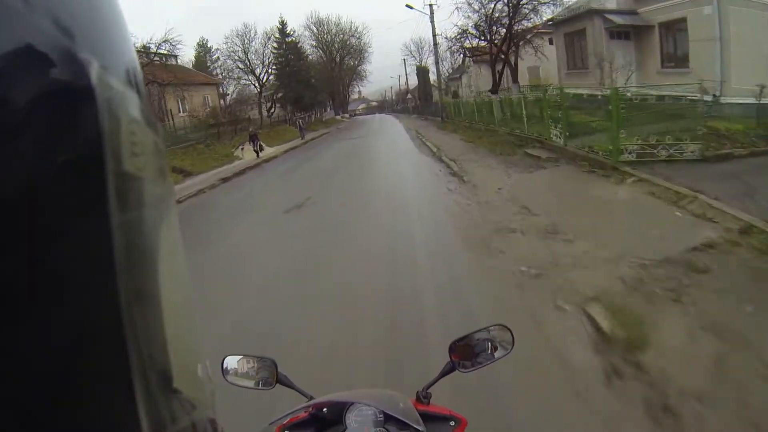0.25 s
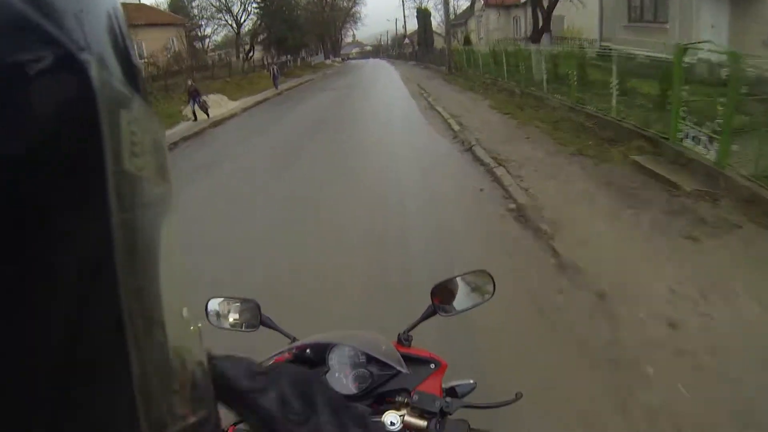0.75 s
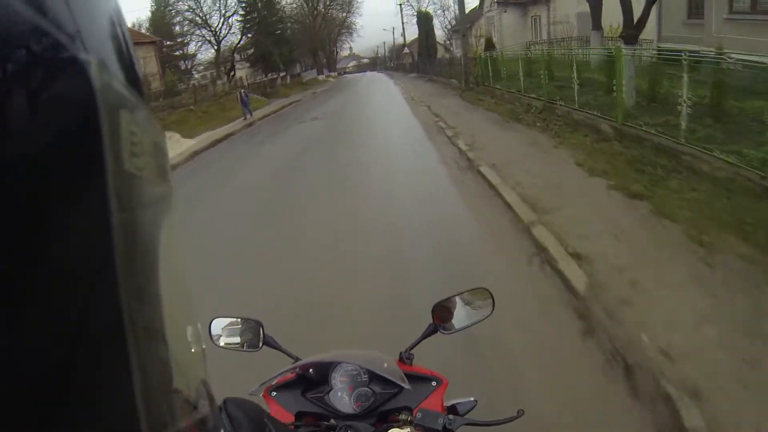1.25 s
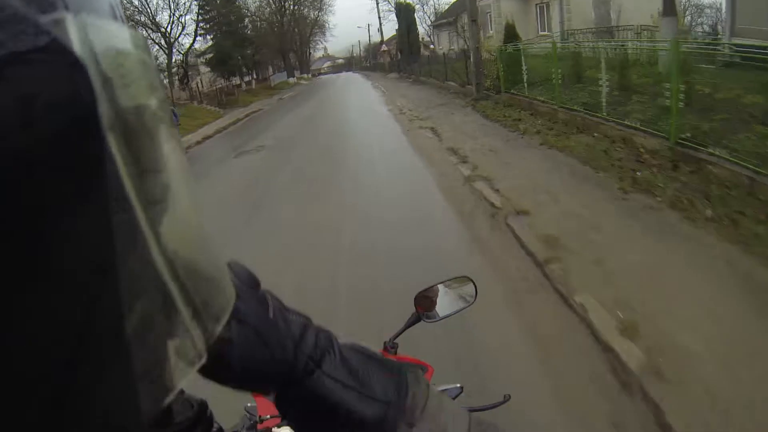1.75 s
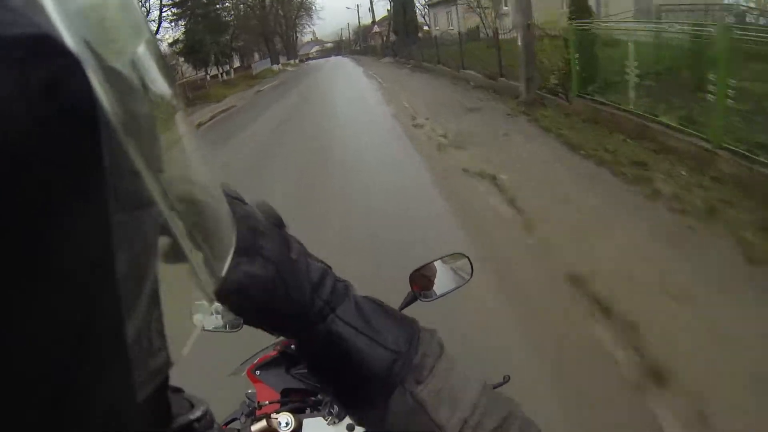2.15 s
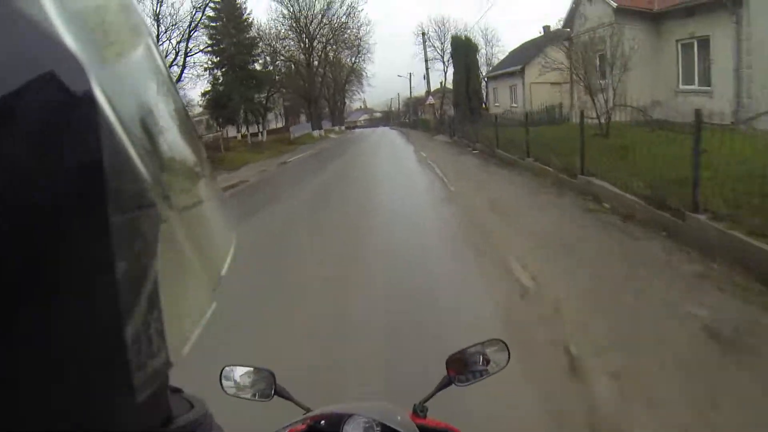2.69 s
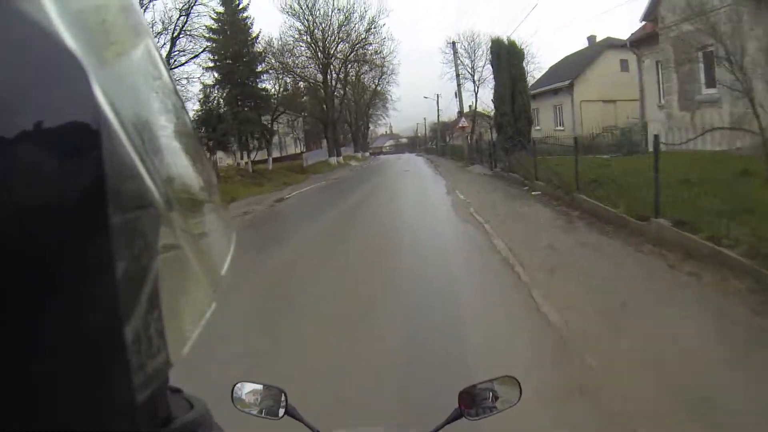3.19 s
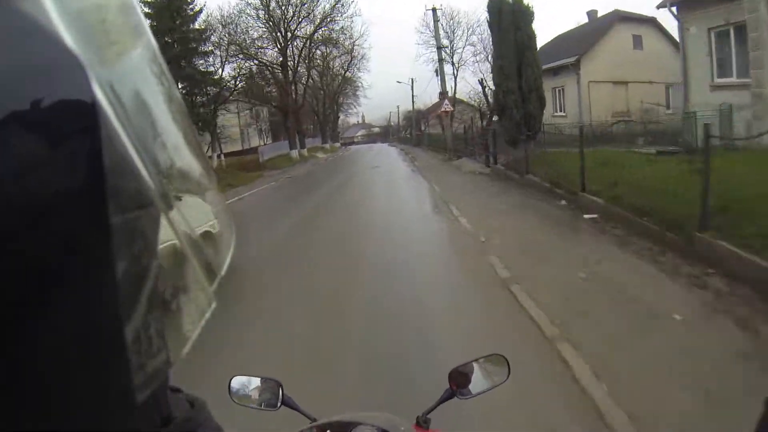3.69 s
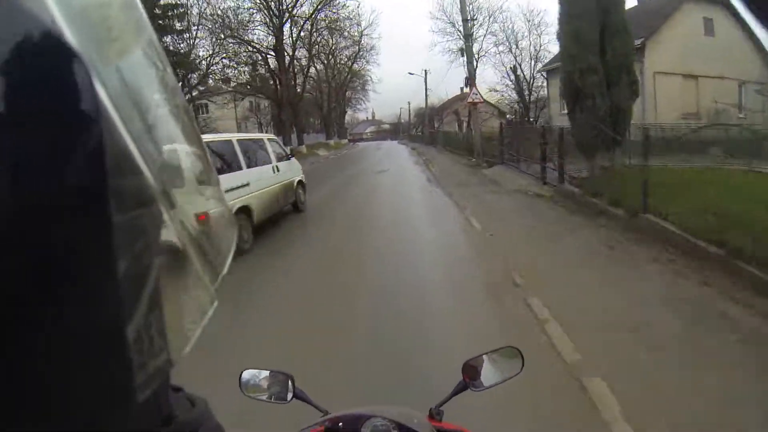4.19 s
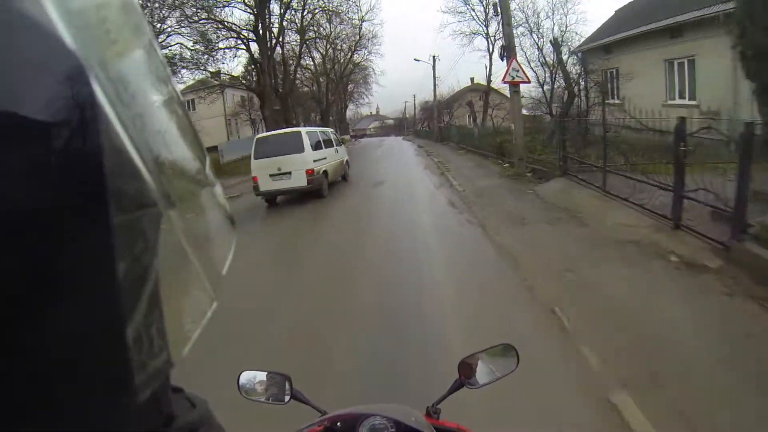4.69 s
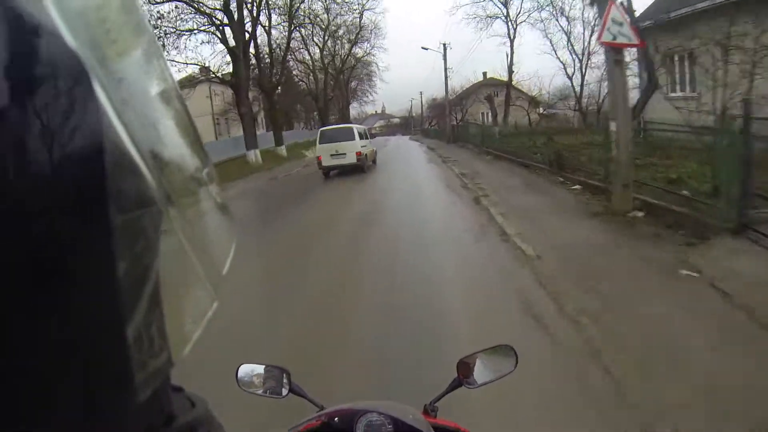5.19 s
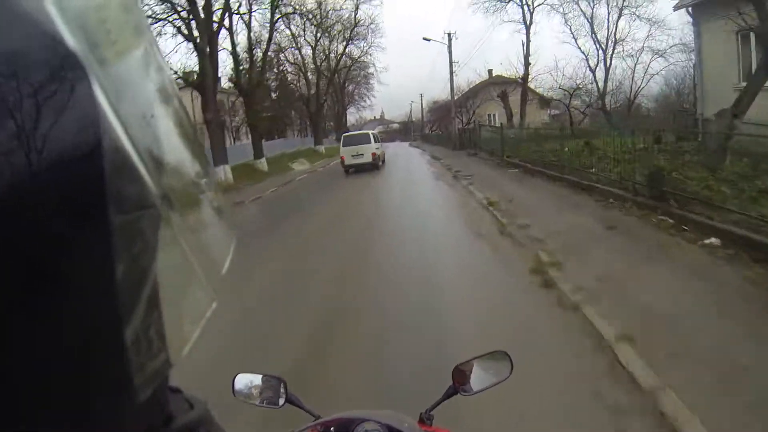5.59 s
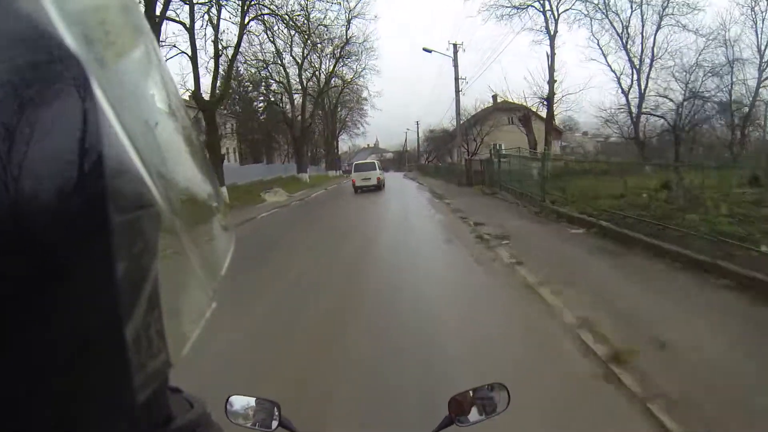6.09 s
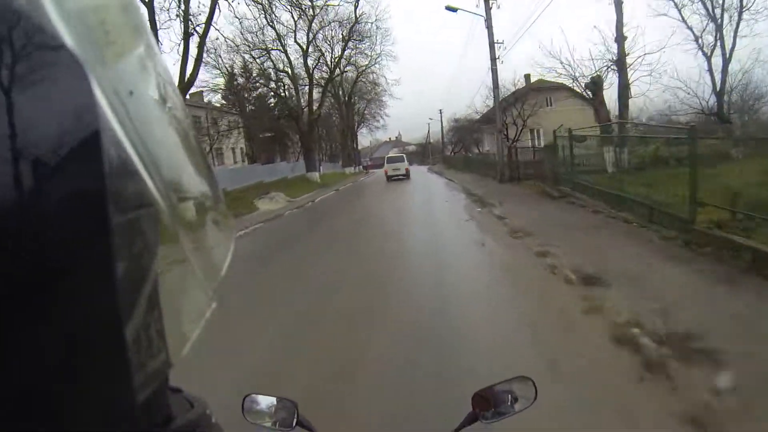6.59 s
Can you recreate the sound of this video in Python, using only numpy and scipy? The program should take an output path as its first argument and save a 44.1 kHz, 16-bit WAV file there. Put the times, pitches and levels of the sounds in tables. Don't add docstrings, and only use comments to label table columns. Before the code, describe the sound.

Boxy helmet-mic motorcycle ride on a wet street: muffled wind and low engine hum, heavy glove thumps, squeaky visor rubs, a passing van's hissing spray.

```python
import sys
import numpy as np
from scipy import signal
from scipy.io import wavfile
from scipy.ndimage import uniform_filter1d

SR = 44100
rng = np.random.default_rng(int(sys.argv[2]) if len(sys.argv) > 2 else 0)


def elevation(decibels):
    levels = np.asarray(decibels, float)
    return 10 ** (levels / 20)


def wav_record(signal):
    frames = np.transpose(np.atleast_2d(signal))
    bounded = np.clip(frames, -1, 1)
    quanta = np.round(bounded * 32767).astype(np.int16)
    wavfile.write(sys.argv[1], SR, quanta)


N = 302084

# start_s, wind_db, engine_db, visor_opening (0-1)
RIDE_COURSE = [(0.0, -38.5, -43.5, 0.3), (.5, -37.5, -41, 0.5), (.85, -37.5, -41, 0.33),
               (1.05, -36.5, -34.5, 0.78), (1.22, -34.5, -34, 0.72), (1.47, -36.5, -38.5, 0.83),
               (1.75, -33.5, -32.5, 0.93), (1.96, -39, -36, 0.94), (2.18, -35.5, -32.5, 1.01),
               (2.6, -34.5, -36.5, 1.01), (2.9, -35, -36.5, 0.76), (3.62, -34, -37, 0.65),
               (3.8, -34, -37.5, 0.64), (4.3, -35.5, -41.5, 0.52), (4.6, -35, -40, 0.46),
               (5.2, -35, -42, 0.53), (5.92, -38, -39, 0.37), (6.85, -39, -39.5, 0.28)]
CALM_DB = -36


def evened(x):
    return x / np.sqrt(np.mean(x ** 2) + 1e-20)


def add(mix, s, sound):
    part = mix[round(s * SR):][:len(sound)]
    part += sound[:len(part)]


def curve(rows, column):
    table = np.transpose(rows)
    return np.interp(np.arange(N) / SR, table[0], table[column])


def bumps_db(modes, hz):
    return sum(db / (1 + (2 * (hz - f0) / width) ** 2) for f0, width, db in modes)


def colour_db(points, hz, stretch=1):
    # pitch_hz, width_hz, lift_db
    case_modes = [(75, 10, 4), (110, 28, 2.5), (188.6, 9.5, 6), (399, 73, 19.5), (860, 180, 8),
                  (1400, 453, 15), (1950, 830, 0.5), (2457, 214, 8.5), (2967, 290, 7), (3420, 550, 5),
                  (4760, 950, 7), (6120, 490, 4.5), (7620, 1300, 6.5), (13600, 1000, 2)]
    f, db = np.transpose(points)
    source_db = np.interp(np.log(hz / stretch + 1), np.log(f + 1), db, left=-90, right=-90)
    return source_db + bumps_db(case_modes, hz)


def stream(points, level_db, size, patchy_db, flicker_db, stretch=1, damped=False):
    hop, hz = size // 4, np.fft.rfftfreq(size, 1 / SR)
    frames = N // hop + 5
    a, b, patches = rng.standard_normal((frames, len(hz), 3)).T
    patches = uniform_filter1d(patches, size=7, axis=0)
    patches = evened(uniform_filter1d(patches, size=9, axis=1))
    flicker = evened(uniform_filter1d(rng.standard_normal(frames), size=5))
    frame_starts = np.minimum(np.arange(frames) * hop, N - 1)
    stretch = (stretch * np.ones(N))[frame_starts]
    db = colour_db(points, hz[:, None], stretch) + patchy_db * patches + flicker_db * flicker
    noise = signal.istft((a + 1j * b) * elevation(db), nperseg=size, noverlap=size - hop)[1][:N]
    if damped:
        noise = noise / np.sqrt(uniform_filter1d(evened(noise) ** 2, size=size) + 0.05)
    return evened(noise) * elevation(level_db)


def wind():
    # pitch_hz, level_db
    rush_colour = [(300, -56), (500, -2), (900, -9.5), (1500, 2), (2300, -7), (4500, -51), (7000, -31.5),
                   (10000, -69), (16000, -52)]
    gap_colour = [(1500, -43), (2400, -11), (3100, 0), (3800, -11), (5200, -32), (6150, -16.5), (7200, -29),
                  (10600, -30), (16000, -56)]
    heave_colour = [(2, -20), (7, -3), (12, 0), (18, -5), (30, -30)]
    buffet_colour = [(10, -13.5), (20, -4), (29, -10), (45, -17.5), (80, -27.5), (200, -66)]
    drone_colour = [(110, -23), (145, -14.5), (170, 10), (200, -6), (260, -35)]
    # start_s, buffeting_db
    gusts = [(0.0, -50), (.6, -30), (.78, -34.5), (.9, -21), (1.24, -30), (1.47, -42), (1.62, -22.5),
             (2.3, -27), (2.61, -32), (2.85, -32.5), (3.3, -39), (3.45, -32.5), (4.06, -29), (4.5, -28.5),
             (5.15, -44), (5.5, -39), (5.93, -30), (6.85, -30.5)]
    opening = curve(RIDE_COURSE, column=3)
    rush = stream(rush_colour, curve(RIDE_COURSE, column=1), size=512, patchy_db=0.4, flicker_db=-0.1)
    gap_pitch = (2792 + 260 * opening ** 2) / 3100
    hiss = stream(gap_colour, -56 + 11.5 * opening, size=512, patchy_db=0.6, flicker_db=1.0, stretch=gap_pitch)
    heave_db = -32 + 7 * elevation(van_db(0, 0))
    heave = stream(heave_colour, heave_db, size=8192, patchy_db=1.1, flicker_db=0.6, damped=True)
    buffet_db = curve(gusts, column=1)
    buffet = stream(buffet_colour, buffet_db, size=8192, patchy_db=1.1, flicker_db=0.6, damped=True)
    drone = stream(drone_colour, -61.5 + 20.5 * opening ** 2, size=4096, patchy_db=3.5, flicker_db=2.0)
    return rush + hiss + heave + buffet + drone


def engine():
    # pitch_hz, level_db
    hum_colour = [(40, -28), (58, -12), (68, -2), (80, -0.5), (120, -4), (185, -7.5), (250, -11),
                  (330, -15)]
    boom_colour = [(150, -43), (260, -5.5), (415, -0.5), (490, -43), (650, -16), (1000, -22)]
    engine_db = curve(RIDE_COURSE, column=2)
    boom_db = -43.5 + engine_db - CALM_DB
    hum = stream(hum_colour, engine_db, size=4096, patchy_db=1.1, flicker_db=2.5)
    boom = stream(boom_colour, boom_db, size=1024, patchy_db=0.9, flicker_db=0.4)
    return hum + boom + firing(engine_db)


def firing(engine_db):
    knots = rng.standard_normal((2, N // 1000 + 2))
    pitch, swell = (np.interp(np.arange(N) / 1000, np.arange(len(v)), evened(uniform_filter1d(v, size=6)))
                    for v in knots)
    firing_hz = 67.5 * (1 + 0.04 * pitch)
    level_db = -43.5 + 0.9 * (engine_db - CALM_DB) + 3 * swell
    return elevation(level_db) * np.sin(2 * np.pi * np.cumsum(firing_hz) / SR)


def spray():
    # pitch_hz, level_db
    low_colour = [(2000, -36), (3200, -6), (3700, 2.5), (4200, -3.5), (6000, -48)]
    middle_colour = [(3500, -19), (4400, -4.5), (4950, 1), (5600, -0.5), (7000, -28)]
    fizz_colour = [(5500, -18), (6400, 1), (7100, -9), (7700, -8), (8300, -15), (8800, -8.5), (9400, -14),
                   (10300, -8), (11300, -15), (13700, -18), (16000, -33)]
    whistle_colour = [(7300, -34), (7800, 6), (8200, 10), (8650, 0), (9100, -31), (10200, -12),
                      (11000, -30)]
    # level_db, share_of_wind (ratio), open_visor_db
    own_tyres = [
        (-59, 0.69, 3),
        (-64.5, 0.67, 4.5),
        (-70.5, 0.43, 2),
        (-77.5, .6, 0),
    ]
    # level_db, lead_s, fade_db_per_s
    van_tyres = [
        (-55.5, 0.25, -3),
        (-54.5, 0.18, 0.5),
        (-60, 0.25, 0),
        (-63.5, -0.47, -1),
    ]
    wind_db = curve(RIDE_COURSE, column=1) - CALM_DB
    opening = curve(RIDE_COURSE, column=3)
    colours = (low_colour, middle_colour, fizz_colour, whistle_colour)
    out = 0
    for colour, (own_db, share, open_db), (db, lead_s, fade_db) in zip(colours, own_tyres, van_tyres):
        own = elevation(own_db + share * wind_db + open_db * opening)
        passing = elevation(db + van_db(lead_s, fade_db))
        out = out + np.hypot(own, passing) * stream(colour, 0, size=512, patchy_db=1.3, flicker_db=0.6)
    return out


def van_db(lead_s, fade_db):
    t = np.arange(N) / SR
    since = t - 4.1 + lead_s
    nearing = np.minimum(since, 0) / 0.19
    leaving = np.maximum(t - 5.06, 0) / 0.94
    return 10 * (nearing - leaving) - fade_db * np.maximum(since, 0)


def van():
    # pitch_hz, width_share (ratio), level_db, lead_s, fade_db_per_s
    van_bands = [
        (1740, .14, -41.5, -0.09, 2),
        (3760, 0.043, -58, -0.25, -4.5),
        (4870, .04, -56.5, 0.39, 14),
        (13500, .04, -84, .4, 3),
    ]
    out = 0
    for hz, share, db, lead_s, fade_db in van_bands:
        band = [(hz * (1 + k * share), drop_db) for k, drop_db in ((-2, -25), (-1, -4), (0, 0), (1, -4), (2, -25))]
        out = out + stream(band, db + van_db(lead_s, fade_db), size=512, patchy_db=5.5, flicker_db=-1.3)
    return out


def blow(db, hz, t60, rise, shell_gain=0):
    t = np.arange(SR) / SR
    swing = elevation(-60 * t / t60) * np.sin(2 * np.pi * hz * t)
    shell = elevation(-60 * t / 0.15) * np.sin(2 * np.pi * 185 * t)
    return -elevation(db) * (1 - np.exp(-(t / rise) ** 2)) * (swing + shell_gain * shell)


def thumps():
    # start_s, peak_db, pitch_hz, t60_s (time to fade by 60 dB), shell_ring_db
    thump_list = [(0.858, 1, 86, 0.09, -21.5), (1.424, -9.5, 88.5, 0.14, -13),
                  (1.626, -5.5, 121, 0.059, -11), (1.7362, -1.5, 113, 0.045, -16),
                  (1.78, -36, 180, 0.036, -22), (1.851, -20, 116, 0.1, -2.5), (1.944, -12, 70, 0.12, -14),
                  (2.129, -17, 116, .14, -12), (2.185, -18, 67, 0.48, -5), (3.766, -17, 96.5, 0.054, -8),
                  (3.856, -9, 59.7, .16, -22), (4.025, 0, 65.6, 0.065, -29.5),
                  (4.236, 3.5, 57.7, 0.054, -42), (4.484, -6.5, 82, 0.043, -19.5),
                  (4.673, -19.5, 144, 0.055, -14), (5.026, -18, 118, 0.046, -16),
                  (5.275, -37, 209, 0.032, -24), (6.573, -23.5, 110, 0.072, -9)]
    out = np.zeros(N)
    for s, db, hz, t60, shell_db in thump_list:
        add(out, s, blow(db, hz, t60, rise=0.62 / hz, shell_gain=elevation(shell_db)))
    return out


def sways():
    # start_s, peak_db, pitch_hz, t60_s, rise_s
    sway_list = [(.885, -13, 39, 0.44, 0.054), (.96, 2.5, 24, 0.18, 0.033), (1.405, 0.5, 32, 0.33, 0.022),
                 (1.734, -3, 30, 0.12, 0.0077), (1.762, 2, 26.7, 0.21, 0.023),
                 (1.95, -12, 12.4, 0.46, 0.018), (2.11, -16, 32.6, 0.88, 0.051),
                 (2.72, -11, 21, 0.18, 0.014), (3.2, -14, 26, 0.33, 0.048), (3.87, -3.5, 30.6, 0.34, 0.009),
                 (3.96, -4, 15.3, 0.27, 0.011), (4.12, -4.5, 11.1, 0.29, 0.021),
                 (4.25, -16, 29.3, 0.92, 0.022), (4.487, -8, 25.5, 0.39, 0.013),
                 (4.55, -5, 19.4, 0.34, 0.022), (4.670, -13, 34, 0.23, 0.016),
                 (4.64, -1, 9.6, 0.17, 0.0087), (4.8, -7.5, 11.8, 0.41, 0.021), (5.03, -23, 37, 0.52, 0.02),
                 (5.17, -21.5, 51, 0.3, 0.022), (5.26, -10.5, 13, 0.44, 0.019),
                 (5.66, 11, 28.7, 0.27, 0.071), (5.84, -9, 25, 0.35, 0.017), (6.57, -11, 18.4, 0.19, 0.014)]
    out = np.zeros(N)
    for s, *push in sway_list:
        add(out, s, blow(*push))
    return out


def ring_of(points, squeak_db, treble_db, body_db=0):
    # pitch_hz, width_hz, share (ratio)
    squeaks = [(1950, 430, 0.76), (2603, 390, 0.71)]
    # pitch_hz, width_hz, level_db
    dead_spots = [(2387, 255, -14), (3100, 49, -14)]
    hz = np.abs(np.fft.fftfreq(4096, 1 / SR))
    db = colour_db(points, hz)
    db += treble_db * np.log2(1 + hz / 4000) + body_db / (1 + (hz / 600) ** 4)
    db += squeak_db * bumps_db(squeaks, hz) + bumps_db(dead_spots, hz)
    log_gain = np.log(elevation(np.maximum(db, -100)))
    return np.fft.ifft(np.exp(np.conj(signal.hilbert(log_gain)))).real[:1024]


def rubs():
    # pitch_hz, level_db
    rub_colour = [(400, -13), (800, -11), (1400, -4), (2000, 0.5), (2800, -4), (3600, -12.5), (4300, -17),
                  (7000, -27.5), (10000, -33.5), (16000, -47)]
    # start_s, peak_db, length_s, squeak_db, treble_db (per octave)
    strokes = [(1.4198, -10, 0.018, 3, -6), (1.608, -22, 0.042, -5, -7), (1.74, -13, 0.015, -7, -24),
               (1.76, -32, 0.017, -3, 7), (1.858, -15.5, 0.017, 2, -17), (1.933, -24.5, 0.052, -7, -14),
               (3.848, -12, 0.0064, 7, -3), (3.853, -15.5, 0.036, -2, 3), (3.874, -15, 0.06, 4, 1.5),
               (3.91, -13.5, 0.07, 10.5, -2.5), (3.988, -15.5, 0.055, 6, 4), (4.056, -25, 0.053, 7, -1),
               (4.102, -24, 0.064, 5, 0), (4.136, -18.5, 0.052, 13.5, 8), (4.484, -11.5, 0.036, 22, 0.5),
               (4.497, -9, 0.045, 12, -4), (4.586, -13, 0.056, 14, 1), (4.666, -13.5, 0.046, 14, 0.5),
               (4.79, -29, 0.045, 14, -4), (4.876, -18, 0.036, 18, -26), (5.552, -25.5, 0.027, 7, -11),
               (5.624, -22.5, 0.038, 7, 3), (5.649, -14.5, 0.033, 10, 6)]
    out = np.zeros(N)
    for s, db, length, squeak_db, treble_db in strokes:
        slips, grit = rng.standard_normal((2, 4000))
        slips = slips * elevation(-1.5 * evened(uniform_filter1d(grit, size=60)))
        peak_at = np.clip(length / 0.11, 0.05, 0.95)
        progress = np.arange(len(slips)) / (SR * length)
        pressure = np.sin(np.pi / 2 * np.interp(progress, [0, peak_at, 1], [0, 1, 0]))
        rung = evened(signal.fftconvolve(slips, ring_of(rub_colour, squeak_db, treble_db), "same"))
        rung = rung / np.sqrt(uniform_filter1d(rung ** 2, size=130) + 0.075)
        add(out, s, 0.34 * elevation(db) * pressure * rung)
    return out


def catches():
    # start_s, peak_db, pitch_hz
    releases = [(1.4272, -13, 1386), (1.5262, -27, 2230), (1.7448, -22, 1600), (1.7507, -17.5, 1520),
                (1.785, -22, 1500), (1.84, -24, 1440), (1.858, -16.5, 1450), (1.8658, -22, 1550),
                (3.232, -30, 1430), (3.8576, -19, 1504), (3.864, -20, 1450), (3.8927, -18, 1440),
                (3.908, -17, 1400), (3.931, -14.5, 1950), (3.934, -21, 1500), (3.9444, -22, 1430),
                (3.96, -21, 2950), (4.0133, -22, 1260), (4.018, -16, 1350), (4.028, -23, 1400),
                (4.0604, -24, 1870), (4.0729, -18.5, 1475), (4.077, -20, 1464), (4.146, -18.5, 1880),
                (4.155, -17, 1720), (4.493, -13.5, 1466), (4.5124, -12.5, 1855), (4.5224, -13, 1300),
                (4.596, -20, 1390), (4.6095, -15, 1810), (4.617, -19, 1360), (4.629, -23, 1810),
                (4.649, -20, 1410), (4.674, -21, 1850), (4.6879, -20, 1750), (5.6512, -20, 1620),
                (5.657, -18, 1586), (5.031, -28, 860), (4.2395, -27.5, 810), (5.663, -22, 1550)]
    out, t = np.zeros(N), np.arange(1500) / SR
    rise_s, t60_s = 0.00091, 0.021
    shape = (1 - np.exp(-(t / rise_s) ** 2)) * elevation(-60 * t / t60_s)
    for s, db, hz in releases:
        turn = 2 * np.pi * hz * t * (1 - 0.03 * t / t60_s)
        overtone_db = -17 - 12 * (hz / 1500 - 1)
        ping = np.sin(turn) + elevation(overtone_db) * np.sin(1.9 * turn)
        add(out, s, elevation(db) * shape / shape.max() * ping)
    return out


def ticks():
    # pitch_hz, level_db
    tap_colour = [(100, -5), (250, 4.5), (420, -1), (800, -21), (1500, 0), (2100, 1), (3000, -6.5),
                  (4200, -24), (8000, -50), (16000, -70)]
    # start_s, peak_db, squeak_db, treble_db (per octave), hollow_body_db
    tick_list = [(1.294, -45, 2, 2, -3), (1.524, -16.5, -10, -5, -5), (1.636, -23.5, -8, 4, 16),
                 (1.7413, -16, -3, -13, -12), (1.746, -15.5, -6, -13, 15), (1.783, -30, -7, -6, 5),
                 (1.837, -17, 2, -12, 10), (1.8919, -19, -12, -3, 0), (1.955, -22, -14, -12, 11),
                 (1.931, -22, -6, -2, 6), (2.163, -18.5, -5, 1, -7), (2.827, -40, 4, -4, 1),
                 (3.232, -37, -16, -12, 0), (3.771, -15, -18, -22, -14.5), (4.0738, -15.5, -13, 5, -18),
                 (4.2386, -10, 15, 7, 10.5), (4.492, -30, 0, -6, 20), (4.672, -19.5, 2, 2, 11),
                 (5.028, -16.5, 4, 1, -7), (5.035, -10.5, 2, -7, -3.5), (5.259, -15, -4, 4, 4),
                 (5.2806, -7, -1, 0.5, 3.5), (6.573, -27.5, -12, -1, 26), (.858, -26, -8, -6, 25)]
    out, t = np.zeros(N), np.arange(300) / SR
    click = np.exp(-(t / 0.00006) ** 2)
    rebound = 0.42 * np.exp(-((t - 0.00068) / 0.0001) ** 2)
    for s, db, *touch_db in tick_list:
        chatter = 0.27 * rng.standard_normal(len(t)) * np.exp(-t / 0.0015)
        tick = np.convolve(click + rebound + chatter, ring_of(tap_colour, *touch_db))
        tick = tick * np.exp(-np.arange(len(tick)) / (SR * 0.006))
        add(out, s, elevation(db) * tick / np.abs(tick).max())
    return out


def scene():
    ride = wind() + engine() + spray() + van()
    glove = thumps() + sways() + rubs() + catches() + ticks()
    return (ride + glove)[None]


def top_cut(x):
    return signal.sosfilt(signal.butter(12, 15250, fs=SR, output="sos"), x)


def record(dry):
    hiss = elevation(-74) * rng.standard_normal(dry.shape)
    bass_cut = signal.butter(1, 4, "high", fs=SR, output="sos")
    roll_off = signal.butter(10, 14400, fs=SR, output="sos")
    heard = signal.sosfilt(np.vstack([bass_cut, roll_off]), dry + hiss)
    return top_cut(heard)


dry = scene()
out = record(dry)
wav_record(out)
```